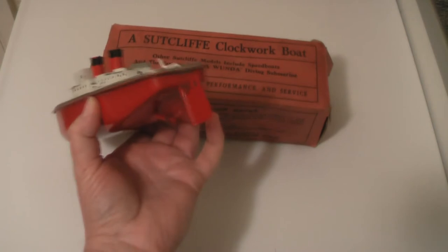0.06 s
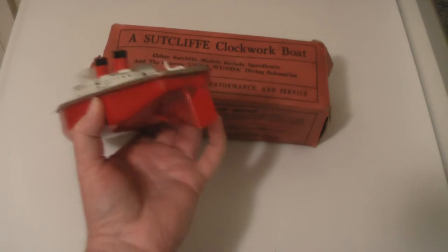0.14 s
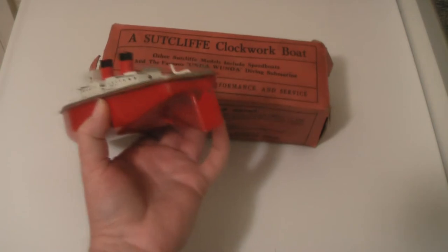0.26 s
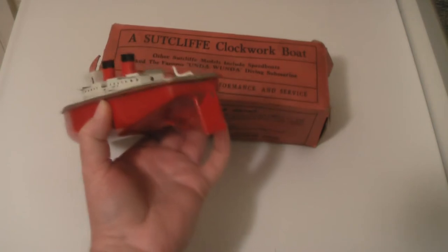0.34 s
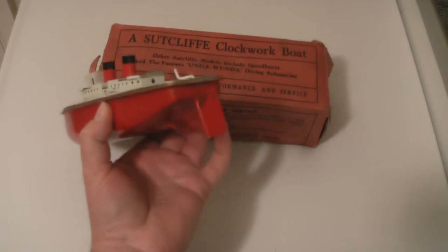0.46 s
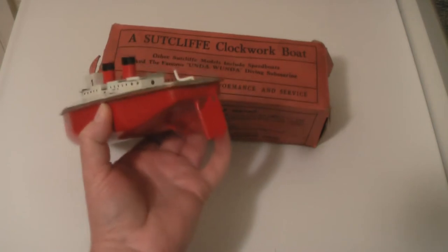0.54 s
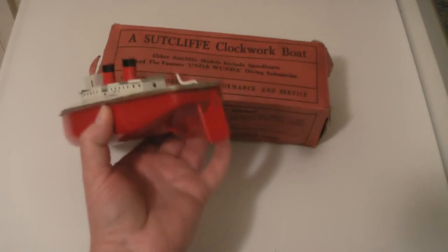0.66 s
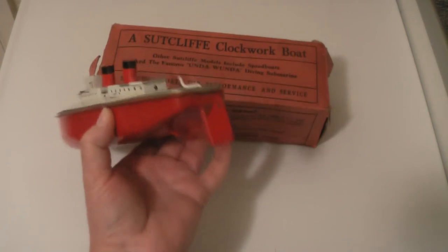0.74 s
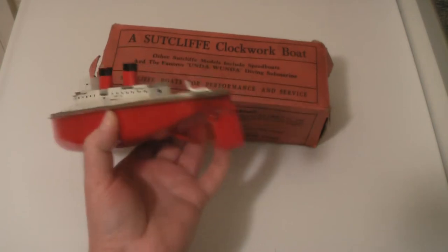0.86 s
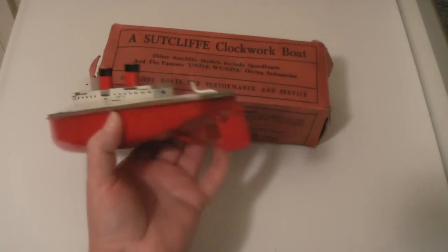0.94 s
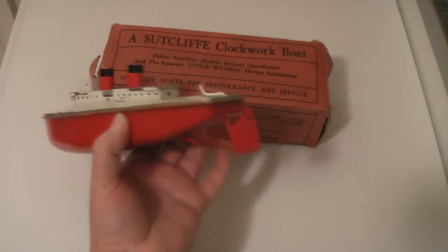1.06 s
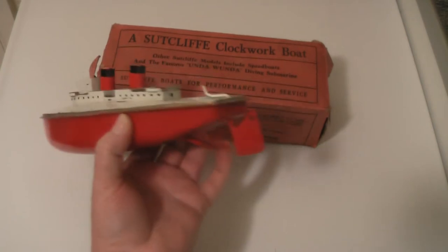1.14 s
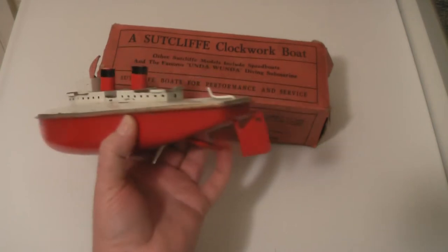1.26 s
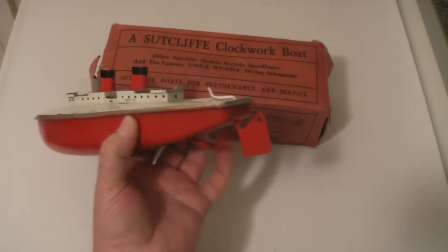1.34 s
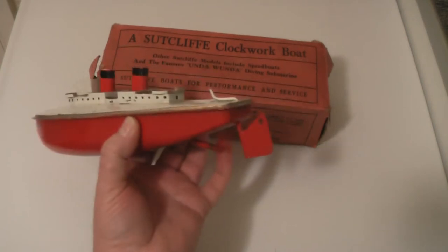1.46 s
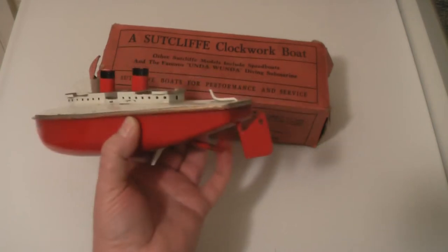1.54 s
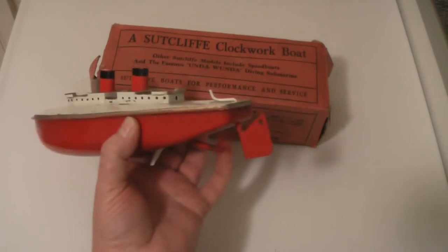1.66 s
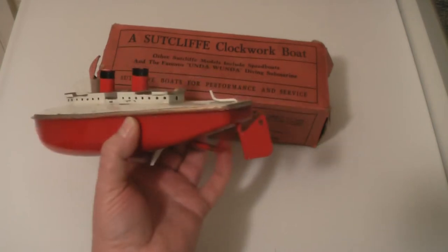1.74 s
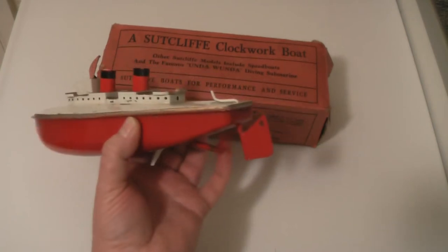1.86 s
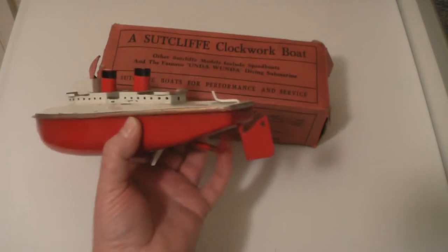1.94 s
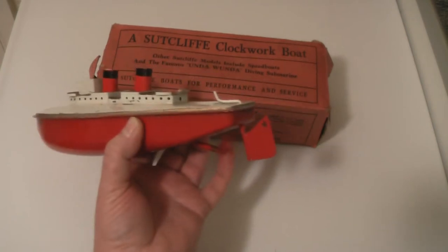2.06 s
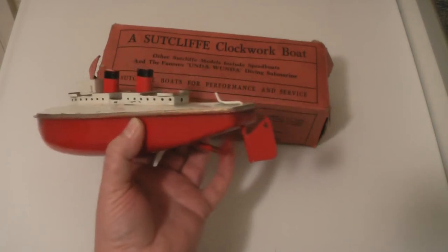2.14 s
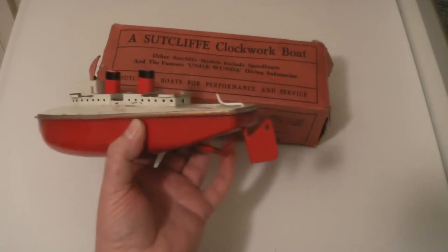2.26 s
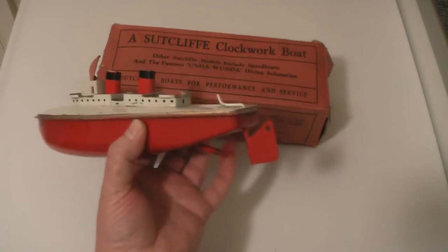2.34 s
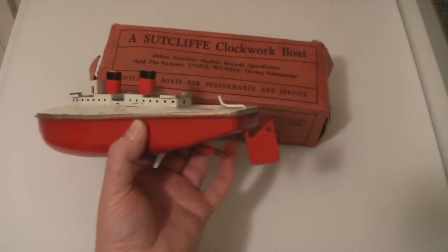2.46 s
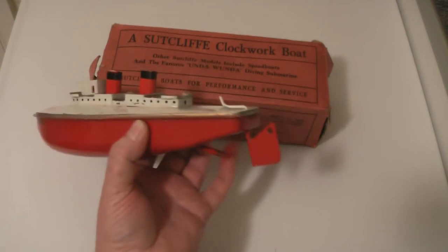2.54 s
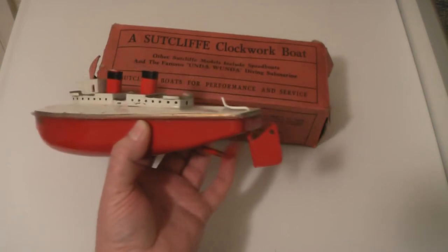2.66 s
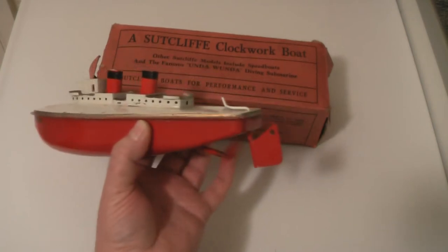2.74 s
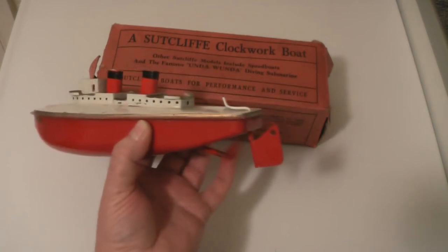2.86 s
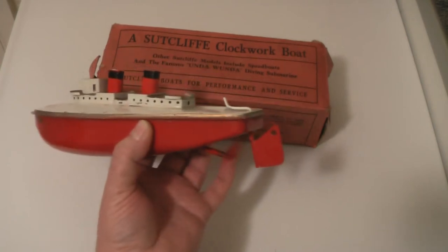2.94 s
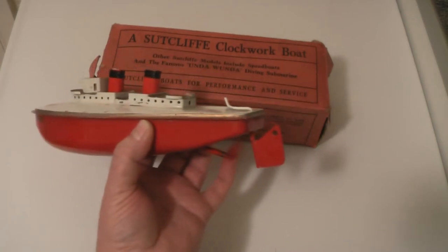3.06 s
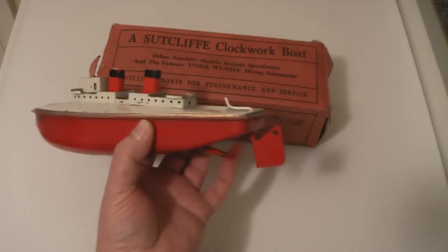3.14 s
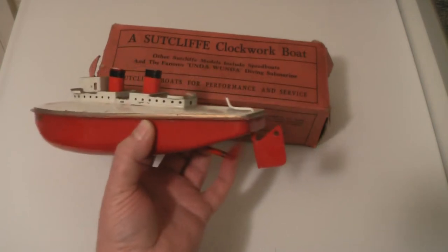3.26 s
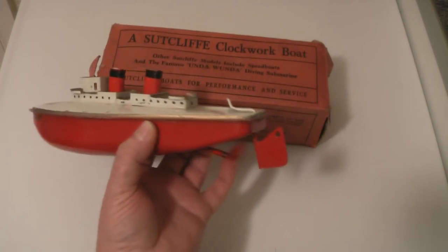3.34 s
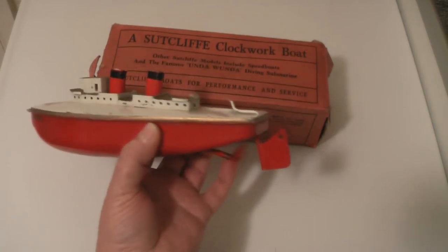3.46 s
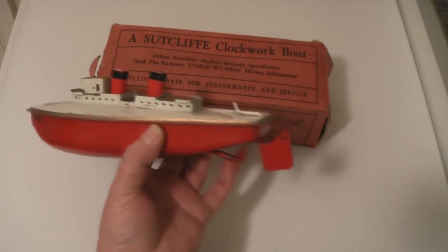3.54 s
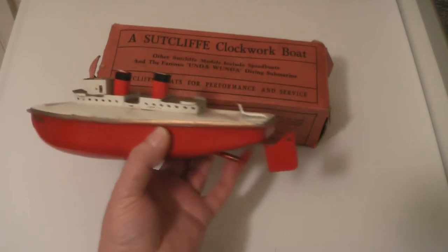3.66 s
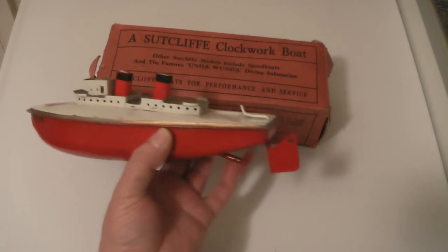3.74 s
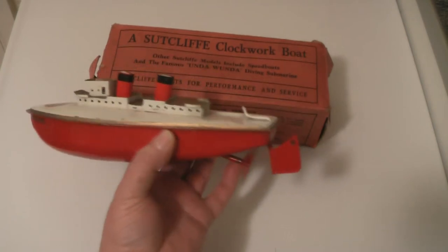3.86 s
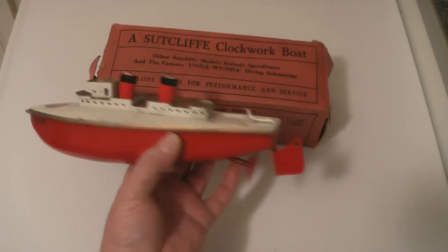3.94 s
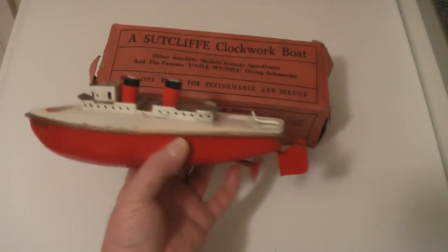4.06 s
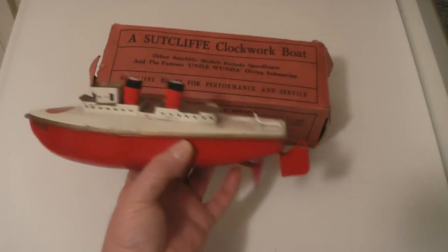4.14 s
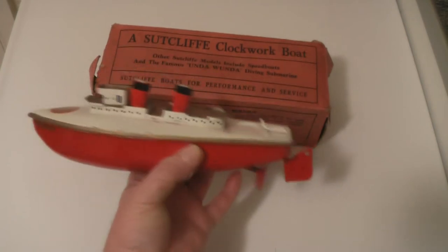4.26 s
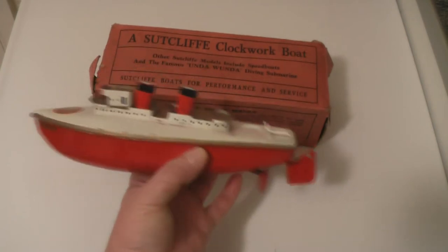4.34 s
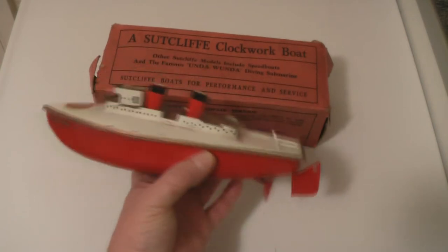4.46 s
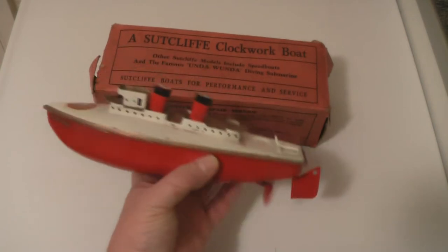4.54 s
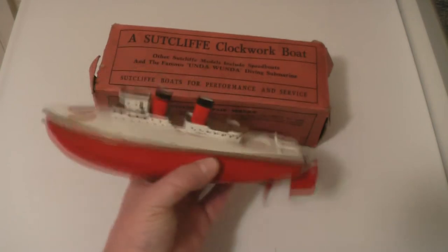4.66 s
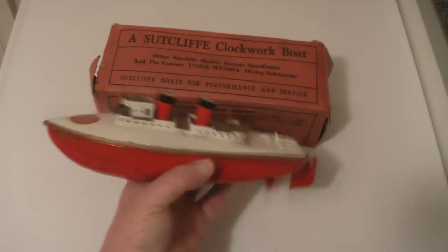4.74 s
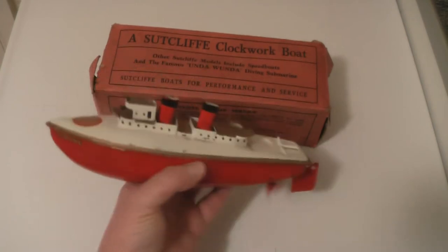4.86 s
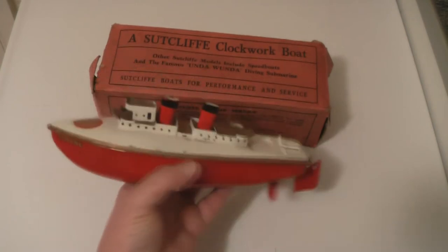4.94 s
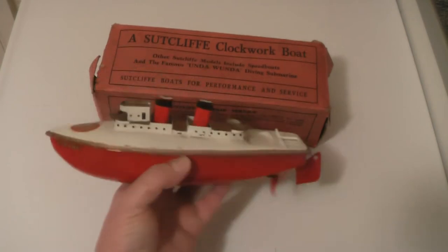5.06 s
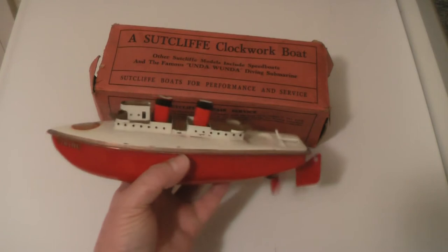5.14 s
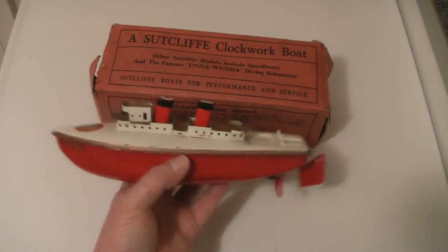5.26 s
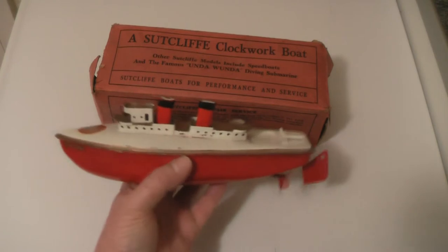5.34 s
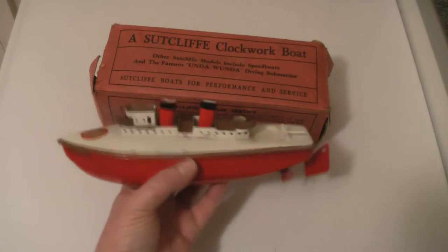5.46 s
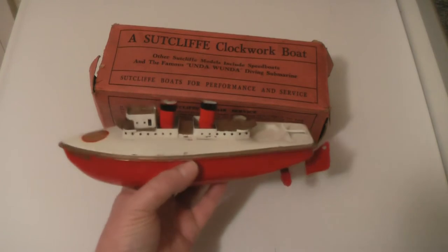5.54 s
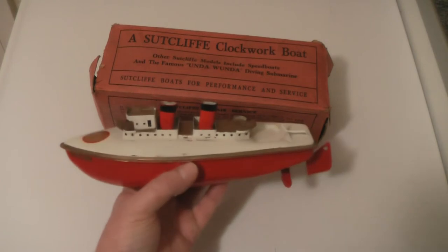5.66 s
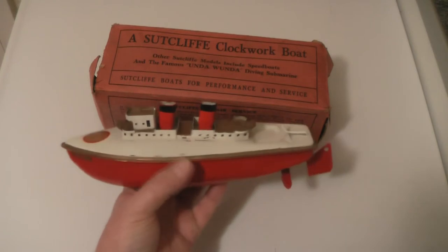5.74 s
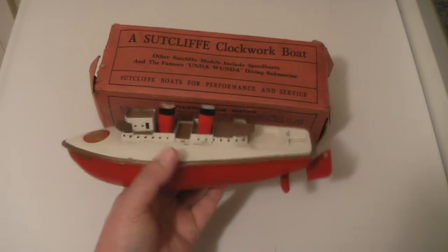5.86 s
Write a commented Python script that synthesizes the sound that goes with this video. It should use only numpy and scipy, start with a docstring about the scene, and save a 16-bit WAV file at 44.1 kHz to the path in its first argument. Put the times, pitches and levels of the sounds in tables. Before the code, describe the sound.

Close in a small room, a wind-up motor rattles in a thin tin hull: dense buzzing, singing gear teeth and a fast knocking shaft. It slows continuously, growing duller and more granular until individual turns are audible. Past four seconds, uneven tinny clacks and small thuds break out, bunching near five seconds, then everything stops, leaving soft room tone.

```python
"""A fast tinny whirr slows to separate clacks and stops: a clockwork tin boat, hand-held in a small room.
The propeller, in air, turns a shaft that rolls and knocks in its bearing; gear teeth sing and chatter.
Timed impulses and tones drive resonances of hull, plates and dense tin; loose parts clack at the stall.
Shaped noise makes finger rubs, the spring's hum and whine, a rumble and the room tone."""
import sys
import numpy as np
from scipy import signal
from scipy.fft import rfft, irfft, next_fast_len
from scipy.io import wavfile

SR = 44100
rng = np.random.default_rng(int(sys.argv[2]) if len(sys.argv) > 2 else 0)


def store_wav(level_fs):
    """Save 16-bit WAV to argv[1]."""
    pcm = np.round(np.clip(np.atleast_2d(level_fs), -1, 1) * 32767)
    wavfile.write(sys.argv[1], SR, pcm.T.astype(np.int16))


N = 260300

# Room tone spectrum: freq_hz, relative_level_db
ROOM_TONE_SPECTRUM = [(20, -16), (45, -1), (70, -18), (140, 3.5), (300, 11.5), (700, 9.5), (2000, 0),
                      (6000, -26), (16000, -28.5)]
# Stereo width of the room ring: freq_hz, side_minus_mid_db
ROOM_WIDTH = [(100, -59), (450, -8.5), (1200, -8.5), (2500, -3.5), (5500, -6), (8500, -1.5), (11000, -51)]
# Fingers shifting on the hull: centre_s, level_db, half_length_s (to 1/e), centre_hz
FINGER_RUBS = [(0.176, -54.5, 0.3, 194), (3.57, -42.5, 0.045, 265), (3.685, -43.5, 0.094, 265),
               (3.73, -49, 0.037, 180), (5.165, -43, 0.0088, 263), (5.169, -41, 0.01, 906),
               (5.2, -45, 0.054, 380), (5.242, -50.5, 0.04, 300), (5.37, -48, 0.093, 352),
               (5.707, -52, 0.1, 340)]
# Hum of the spring: freq_hz, width_hz, relative_level_db
SPRING_MODES = [(1015, 62, -7), (2320, 650, -13), (4300, 2800, -18.5)]
# Whine of the spring, end rows held: time_s, pitch_hz, level_db
SPRING_WHINE = [(5.2, 1860, -57), (5.46, 1900, -54), (5.6, 1870, -60), (5.71, 1880, -57), (5.88, 1860, -68)]
# Bending modes of the whole hull, held loosely: freq_hz, width_hz, stern_on_db, side_on_db
HULL_MODES = [(212, 13, -40, -8.5), (304, 4.1, -10, -20), (348.5, 31, -5, -14), (379, 34, -6.5, -15.5),
              (418.4, 11.4, -21, -3.5), (488, 15, 5, 6.5), (558, 25, -10, -1.5), (473, 48, -11.5, -7.5),
              (650, 25, -31, -47), (713, 47, -13, -13), (786, 18, -4, -23), (896, 18, 2, -23.5)]
# Deck and side plate modes, before any wander: freq_hz, width_hz, stern_on_db, side_on_db
PLATE_MODES = [(474, 88, -38, -12), (895, 60, -5.5, -10), (1276, 34, 4.5, 0), (1354, 38, 5.5, 3.5),
               (1603, 132, -11, -2.5), (1690, 57, -0.5, 2.5), (1801, 43, -3, -3), (2050, 380, -1.5, -63),
               (2183, 310, -9.5, -12), (2460, 220, -20.5, -6.5), (2738, 31, -12, -17), (3010, 60, 1.5, -4),
               (3250, 67, -5, -12), (3263, 160, 1, -9), (3430, 137, -2.5, -9.5), (3915, 176, -13, -6.5),
               (4790, 56, -17, -15.5), (4920, 34, -3, -7.5), (5170, 77, -10, -18), (5340, 49, -7, -9),
               (5930, 86, -19, -11), (9160, 65, -6, -22)]
# Dense upper ringing of the tin: freq_hz, relative_level_db
TIN_SPECTRUM = [(200, -50), (400, 0.5), (680, -13), (1100, 0), (2200, -2), (3300, 4), (4300, -3),
                (6300, -1), (7300, -5.5), (10000, -3.5), (12000, -4.5), (14000, -7), (16000, -13.5)]
# Heavy shaft drops on the last slow turns: time_s, thud_db, hum_db
SHAFT_DROPS = [(4.738, -14, -9), (4.972, -7, -11), (5.062, -11.5, -20), (5.172, -10, -10), (5.304, -14, -6),
               (5.321, -17, -14), (5.44, -22, -16), (5.497, -11, -11), (5.554, -11, -12.5)]
# Loose parts falling together: start_s, blow_db, plate_ring_db, zing_db, zing_hz, contact_decay_s
LOOSE_CLACKS = [(4.315, -4.5, 2.5, -21, 7300, 0.0062), (4.423, -12, 9, -28, 7200, 0.0023),
                (4.543, -7, 2, -11, 7240, 0.012), (4.736, -9, -17, -11, 7140, .004),
                (4.807, -5.5, -1, 1, 3050, 0.0015), (4.971, -6, -4, -15, 12800, 0.001),
                (5.06, -18, -7, -11, 7200, 0.006), (5.08, -15, 6.5, -18, 7300, 0.0055),
                (5.16, -16, -17, 0.5, 10200, 0.006), (5.166, -6.5, -10, 6, 4860, 0.0048),
                (5.169, -15, -12, 3, 12500, .004), (5.18, -26, -6, 12, 4900, .018),
                (5.2, -28, -6, 10, 4950, 0.022), (5.296, -15.5, 0, -4, 3060, 0.001),
                (5.332, -23, 6, -4, 7200, 0.011), (5.39, -24.5, 5.5, -10, 4900, 0.0023),
                (5.513, -25, 1, 0, 3180, 0.004), (5.53, -6.5, -9, -4, 10000, 0.0035),
                (5.531, -19, -8, 4, 6840, 0.0026), (5.532, -18, -10, 3, 1700, .003)]
# Thin deck parts ringing in turn: loudest_s, spread_s (Gaussian sigma), freq_hz, width_hz, level_db
DECK_GLINTS = [(.4, 0.7, 6220, 750, -11), (.5, 0.52, 3480, 350, -12.5), (2.702, 1.4, 8550, 346, -18),
               (3.2, 1, 14200, 300, -31), (4.1, .4, 5350, 600, -12.5), (4.4, 0.37, 7160, 600, -11)]
# Propeller shaft: time_s, speed_turns_per_s
SHAFT_SPEED = [(0, 58.18), (.25, 54.97), (.65, 54.34), (.95, 51.93), (2.45, 41.16), (2.8, 37.01),
               (2.9, 36.66), (3.55, 29.61), (3.75, 25.02), (3.9, 24.21), (5.15, 9.14), (5.5, 2.81),
               (5.65, 0)]
# Shaft push that is smooth rolling, not knocking: speed_turns_per_s, share (0-1)
ROLLING_SHARE = [(28, 0), (42, .5)]
# Shaft push on the hull, fading once the slow shaft rides on its bearing: time_s, level_db
SHAFT_PUSH_LEVEL = [(0, -33), (.35, -36), (.75, -31), (1.05, -32.5), (1.35, -33.5), (1.75, -34.5),
                    (2.15, -32), (2.7, -31), (3.1, -35.5), (3.6, -30.5), (3.95, -36.5), (4.74, -39),
                    (4.8, -49), (5.5, -80)]
# Successive multiples of shaft speed in the rolling push: relative_level_db
WHIRL_ORDERS_DB = [-11, 1.5, -0.5, -30, 2, 1.5, 1.5, 2.5, 0, -10, 4.5, -3]
# Successive multiples of shaft speed in the gear song: relative_level_db
GEAR_ORDERS_DB = [-8, -2, -9.5, -4.5, -3.5, -1, -7, -2.5, -3]
FIRST_WHIRL_ORDER, FIRST_GEAR_ORDER = 5, 14

# Levels hold above a knee speed (turns/s), then fall by so many dB per halving of speed.
CHATTER_DB, CHATTER_KNEE_TURNS_PER_S, CHATTER_FALL_DB = -27, 29.1, 10
TREBLE_KNEE_TURNS_PER_S, TREBLE_FALL_DB = 15.2, 11.5
PLATE_WANDER_SHARE = .025  # of modal pitch
# The tightening grip broadens the hull modes.
TIGHTEN_START_S, TIGHTEN_S, GRIP_WIDTH_HZ = 3.6, 0.18, 39
# Stern-on to side-on; a power below 1 starts quickly and eases off.
SWING_START_S, SWING_S, SWING_POWER = 0.85, 4.9, 0.62
SLACK_S, SLACK_DB, SLACK_SINK_DB_PER_S, SLACK_FADE_DB_PER_S = 5.25, -47.5, 1.5, 32
RUMBLE_DB, RUMBLE_FULL_S, RUMBLE_RISE_DB_PER_S = -63, 3.7, 4
TOP_HZ = 15750

TIME_S = np.arange(N) / SR
PADDED = next_fast_len(N + SR // 2, real=True)
FREQ_HZ = np.maximum(np.arange(PADDED // 2 + 1) * SR / PADDED, 1)


def undb(db):
    """Decibels to gain."""
    return 10 ** (np.asarray(db) / 20)


def curve(rows):
    """Interpolate the columns of a timed table at every sample."""
    time_s, *columns = np.transpose(rows)
    return [np.interp(TIME_S, time_s, column) for column in columns]


def colour(points):
    """Gain at every frequency, interpolated in dB over log frequency."""
    hz, db = np.transpose(points)
    return undb(np.interp(np.log(FREQ_HZ), np.log(hz), db))


def unit(response):
    """Scale a response to pass white noise at unchanged power."""
    return response / np.sqrt(np.mean(np.abs(response) ** 2))


def through(x, response):
    """Filter a sound by a frequency response."""
    spectrum = rfft(x.astype(np.float32), PADDED)
    return irfft(spectrum * response.astype(np.complex64), PADDED)[:N]


def noise_through(response, gain=1):
    """White noise, given a gain over time, then filtered."""
    return through(rng.standard_normal(N) * gain, response)


def modes(rows):
    """Response of damped resonances; neighbours move in opposite directions."""
    f, out = FREQ_HZ.astype(np.float32), 0
    for k, (hz, width_hz, db) in enumerate(rows):
        detune = (f - float(hz) ** 2 / f) / float(width_hz)
        real = float((-1) ** k * undb(db)) / (1 + detune * detune)
        out = out + real - 1j * (real * detune)
    return out


def bump(hz, width_hz):
    """Unit-power response of one mode applied twice, for steeper skirts."""
    return unit(modes([(hz, width_hz, 0)]) ** 2)


def tail(t60_s, delay_s=0):
    """Response of countless modes or echoes that die away together."""
    decay = np.exp(-np.log(1000) * TIME_S / t60_s)
    return unit(rfft(rng.standard_normal(N) * decay * (TIME_S >= delay_s), PADDED))


def crossfade(k, count):
    """Triangular weight of position k out of count, spread over the whole sound."""
    return np.maximum(1 - np.abs(np.linspace(0, count - 1, N) - k), 0)


def drifting(x, t60_s, delay_s=0, count=5):
    """A dense ring whose fine pattern changes as the boat moves from one position to the next."""
    return sum(through(x * np.sqrt(crossfade(k, count)), tail(t60_s, delay_s)) for k in range(count))


def room_tone(level_db=-58.0):
    """Steady coloured noise of the quiet room."""
    return undb(level_db) * noise_through(unit(colour(ROOM_TONE_SPECTRUM)))


def room(x, t60_s=0.34, wet_db=-4, wet_above_hz=600, tone_side_db=-7):
    """Direct sound and the ring of a small room, drier in the bass, over room tone."""
    direct = x / np.sqrt(1 + undb(wet_db) ** 2)
    sent = through(direct, undb(wet_db) * FREQ_HZ / np.hypot(FREQ_HZ, wet_above_hz))
    mid, side = (drifting(sent, t60_s, delay_s=0.0023) for _ in range(2))
    centre = direct + mid + room_tone()
    spread = through(side, colour(ROOM_WIDTH)) + undb(tone_side_db) * room_tone()
    return np.array([centre + spread, centre - spread])


def rumble(hz=72, width_hz=85):
    """Low-band noise: a faint deep rumble comes up under the whirr and stays."""
    db = RUMBLE_DB + RUMBLE_RISE_DB_PER_S * np.minimum(TIME_S - RUMBLE_FULL_S, 0)
    return noise_through(bump(hz, width_hz), undb(db))


def fingers(width_hz=170):
    """Skin rubs and bumps dully on the hull: short swells of band noise."""
    out = 0
    for centre_s, db, half_length_s, hz in FINGER_RUBS:
        swell = np.exp(-((TIME_S - centre_s) / half_length_s) ** 2)
        out = out + undb(db) * noise_through(bump(hz, width_hz), swell)
    return out


def spring_hum():
    """Sliding coils hum faintly, sinking slowly until the spring is slack, then dying away."""
    after_s = TIME_S - SLACK_S
    db = SLACK_DB - np.maximum(SLACK_SINK_DB_PER_S * after_s, SLACK_FADE_DB_PER_S * after_s)
    return noise_through(unit(modes(SPRING_MODES)), undb(db))


def spring_whine(flutter_hz=50):
    """A thin spring tone, unsteady in level through slow noise, fading at the end."""
    hz, db = curve(SPRING_WHINE)
    flutter = noise_through(unit(1 / (1 + (FREQ_HZ / flutter_hz) ** 2)))
    return undb(db) * flutter * np.sqrt(2) * np.sin(2 * np.pi * np.cumsum(hz) / SR)


def swing(time_s):
    """How far the boat has turned: 0 stern-on, 1 side-on."""
    return np.clip((time_s - SWING_START_S) / SWING_S, 0, 1) ** SWING_POWER


def facing(rows):
    """Responses of a set of modes heard from the stern and from the side."""
    stern_on = unit(modes([(hz, width, db) for hz, width, db, _ in rows]))
    side_on = unit(modes([(hz, width, db) for hz, width, _, db in rows]))
    return stern_on, side_on


def radiate(hits, rows):
    """Blows ring the modes, whose balance shifts as the boat swings round."""
    stern_on, side_on = facing(rows)
    turned = swing(TIME_S)
    return through(hits * (1 - turned), stern_on) + through(hits * turned, side_on)


def hull_ring(push, cut_hz=300):
    """Pushes bend the whole hull, which gives off little bass and rings shorter once gripped."""
    held = np.clip((TIME_S - TIGHTEN_START_S) / TIGHTEN_S, 0, 1)
    damped = [(hz, width + GRIP_WIDTH_HZ, stern_db, side_db) for hz, width, stern_db, side_db in HULL_MODES]
    ring = radiate(push * (1 - held), HULL_MODES) + radiate(push * held, damped)
    return through(ring, 1 / np.sqrt(1 + (cut_hz / FREQ_HZ) ** 6))


def plate_ring(hits, steady_below_hz=1900, count=7):
    """Plates change balance with the swing; upper modes wander as the hand flexes the tin."""
    hz, width_hz, stern_db, side_db = np.transpose(PLATE_MODES)
    out = 0
    for k, side in enumerate(swing(np.linspace(0, TIME_S[-1], count))):
        wander = PLATE_WANDER_SHARE * rng.uniform(-0.97, 1, len(hz))
        flexed_hz = hz * (1 + wander * (hz > steady_below_hz))
        db = 20 * np.log10((1 - side) * undb(stern_db) + side * undb(side_db))
        response = unit(modes(zip(flexed_hz, width_hz, db)))
        out = out + through(hits * crossfade(k, count), response)
    return out


def tin_ring(hits, low_t60_s=0.13, high_t60_s=0.037, split_hz=5500, tick_db=-3, wheels_db=-5, wheels_t60_s=0.075):
    """Blows tick, ring the brass wheels and stir dense tin modes; the high ones die first."""
    shape = unit(colour(TIN_SPECTRUM))
    high = 1 / (1 + (split_hz / FREQ_HZ) ** 4)
    tick = through(hits, shape * undb(tick_db))
    wheels = through(drifting(hits, wheels_t60_s), shape * undb(wheels_db) * np.sqrt(high))
    out = tick + wheels
    for t60_s, share in (low_t60_s, 1 - high), (high_t60_s, high / 2):
        keep = np.exp(-2 * np.log(1000) / (t60_s * SR))
        energy = signal.lfilter([1 - keep], [1, -keep], hits ** 2 + 1e-18)
        out = out + noise_through(shape * np.sqrt(share), np.sqrt(energy))
    return out / np.sqrt(1 + undb(tick_db) ** 2)


def glints(hits):
    """Thin deck parts ring out, each while it is turned toward the listener."""
    out = 0
    for loudest_s, spread_s, hz, width_hz, db in DECK_GLINTS:
        turned = np.exp(-((TIME_S - loudest_s) / spread_s) ** 2 / 2)
        out = out + undb(db) * through(hits * turned, bump(hz, width_hz))
    return out


def drops(hum_hz=492, hum_width_hz=20):
    """The stalling shaft thuds into its bearing and leaves the hull humming."""
    thuds, hums = np.zeros((2, N))
    for time_s, thud_db, hum_db in SHAFT_DROPS:
        thuds[int(time_s * SR)] += undb(thud_db)
        hums[int(time_s * SR)] += undb(hum_db)
    return hull_ring(thuds) + through(hums, bump(hum_hz, hum_width_hz))


def burst(start_s, decay_s):
    """A brief scraping contact: decaying noise of unit energy."""
    push = rng.standard_normal(N // 20) * np.exp(-TIME_S[:N // 20] / decay_s)
    out, start = np.zeros(N + len(push)), int(start_s * SR)
    out[start:start + len(push)] = push / np.linalg.norm(push)
    return out[:N]


def clacks(spread=0.16, zing_t60_s=0.043):
    """Slack parts fall together, ringing tin and plates and a zinging cluster of high modes."""
    on_tin, on_plates, zings = np.zeros((3, N))
    ring = tail(zing_t60_s)
    band = signal.butter(4, [1 - spread, 1 + spread], "bandpass", analog=True)
    for start_s, db, plate_db, zing_db, hz, decay_s in LOOSE_CLACKS:
        blow = undb(db) * burst(start_s, decay_s)
        on_tin += blow
        on_plates += blow * undb(plate_db)
        cluster = signal.freqs(*band, FREQ_HZ / hz)[1]
        zings += undb(zing_db) * through(blow, unit(cluster * (1 + ring)))
    _, plates_side_on = facing(PLATE_MODES)
    return tin_ring(on_tin) + through(on_plates, plates_side_on) + zings


def slowing_db(speed, knee, fall_db):
    """Level lost as the shaft slows: none above the knee, a fixed step per halving below it."""
    return -fall_db * np.log2(knee / np.clip(speed, 1, knee))


def strikes(turns, at, size):
    """An impulse whenever the shaft passes an angle in `at` (turns); mean power about 1 above 2 turns/s."""
    passed = (at > 0) & (at < turns[-1])
    where = np.searchsorted(turns, at[passed])
    turns_per_sample = np.maximum(np.gradient(turns)[where], 2 / SR)
    strikes_per_turn = len(at) / turns[-1]
    size = size[passed] / np.sqrt(np.mean(size ** 2) * turns_per_sample * strikes_per_turn)
    return np.bincount(where, size, N)[:N]


def shaft_knocks(turns, speed, scatter_db=1.5, wobble_turns=0.0065, rebound_turns=0.52, rebound_db=-7,
                 rebound_wobble_turns=0.041, rebound_knee=22, rebound_fall_db=1.5):
    """The bent shaft hits its bearing once a turn and rebounds, harder as it slows to the knee."""
    turn = np.arange(int(turns[-1]) + 1)
    chance = rng.standard_normal((len(turn), 4)).T
    knock_at = turn + wobble_turns * chance[0]
    rebound_at = turn + rebound_turns + rebound_wobble_turns * chance[1]
    octaves_fast = np.log2(np.maximum(np.interp(turn, turns, speed) / rebound_knee, 1))
    back_db = rebound_db - rebound_fall_db * octaves_fast
    knock = undb(scatter_db * chance[2])
    rebound = -undb(back_db + 2 * scatter_db * chance[3])  # opposite side of the bearing
    return strikes(turns, np.r_[knock_at, rebound_at], np.r_[knock, rebound])


def whirl(turns, speed, flutter_db=2.0):
    """A fast shaft rolls smoothly round its bearing, pushing harder on some turns."""
    orders = sum(undb(db) * np.cos(2 * np.pi * k * turns) for k, db in enumerate(WHIRL_ORDERS_DB, FIRST_WHIRL_ORDER))
    turn = np.arange(int(turns[-1]) + 2)
    flutter = np.interp(turns, turn, flutter_db * rng.standard_normal(len(turn)))
    return 2 * np.sqrt(speed / SR) * orders * undb(flutter)


def gear_chatter(turns, count=32, slack_teeth=.2, wear_db=4.0, scatter_db=4.0, throb_db=1.45, throb_lag_turns=0.16):
    """Unevenly worn teeth hit across their backlash, hardest just after the shaft knocks."""
    wear = np.clip(rng.standard_normal((count, 2)).T, -1.2, 1.2)
    tooth = np.arange((int(turns[-1]) + 1) * count)
    # random timing and strength of each tooth, kept within bounds
    chance = np.clip(rng.standard_normal((len(tooth), 2)).T, -1.7, 1.7)
    at = (tooth + wear[0][tooth % count] / 2 + slack_teeth * chance[0]) / count
    throb = throb_db * np.cos(2 * np.pi * (at - throb_lag_turns))
    db = wear_db * wear[1][tooth % count] + scatter_db * chance[1] + throb
    flank = rng.choice([-1, 1], count)[tooth % count]
    return strikes(turns, at, flank * undb(db))


def wheel_load(turns, depth_db=0.82):
    """The untrue driving wheel leans on the gears once in three and a half shaft turns."""
    return undb(depth_db * np.sin(2 * np.pi * turns / 3.5))


def gear_tones(turns, speed, tone_db=-47, hz=790, width_hz=260, knee=42, fall_db=14):
    """Gear tones glide down through a broad motor-frame resonance and fade as the gears slow."""
    tones = 0
    for k, db in enumerate(GEAR_ORDERS_DB, FIRST_GEAR_ORDER):
        tones = tones + undb(db) * np.sin(2 * np.pi * (k * turns + rng.random()))
    level = undb(tone_db + slowing_db(speed, knee, fall_db))
    return through(tones * level, modes([(hz, width_hz, 0)]))


def motor(plate_db=0.16, knock_treble_db=-21):
    """Knocks and chatter ring hull, plates and tin, softer and duller as the spring runs down."""
    speed = curve(SHAFT_SPEED)[0]
    turns = np.cumsum(speed) / SR + .19
    knocks = shaft_knocks(turns, speed)
    chatter_level = undb(CHATTER_DB + slowing_db(speed, CHATTER_KNEE_TURNS_PER_S, CHATTER_FALL_DB))
    chatter = gear_chatter(turns) * wheel_load(turns)
    hits = (chatter + undb(knock_treble_db) * knocks) * chatter_level
    sizzle = tin_ring(hits * undb(slowing_db(speed, TREBLE_KNEE_TURNS_PER_S, TREBLE_FALL_DB)))
    rolling = np.interp(speed, *np.transpose(ROLLING_SHARE))
    push = (1 - rolling) * knocks + rolling * whirl(turns, speed)
    push = push * undb(curve(SHAFT_PUSH_LEVEL)[0])
    plates = undb(plate_db) * plate_ring(hits)
    return plates + sizzle + glints(hits) + hull_ring(push) + gear_tones(turns, speed)


def scene(left_db=0.05):
    """The boat in its room, the whole image a hair left of centre."""
    boat = rumble() + fingers() + spring_hum() + spring_whine() + drops() + clacks() + motor()
    return room(boat) * undb([[left_db], [-left_db]])


def record(dry):
    """Steep elliptic low-pass at TOP_HZ."""
    return signal.sosfilt(signal.ellip(12, .2, 80, TOP_HZ, fs=SR, output="sos"), dry)


dry = scene()
out = record(dry)
store_wav(out)
```